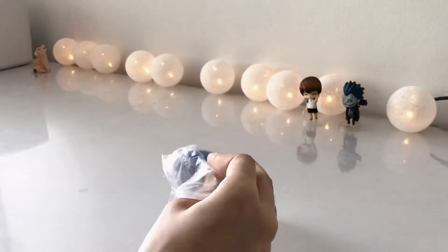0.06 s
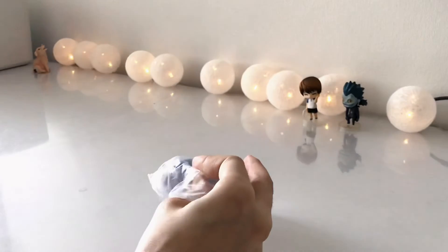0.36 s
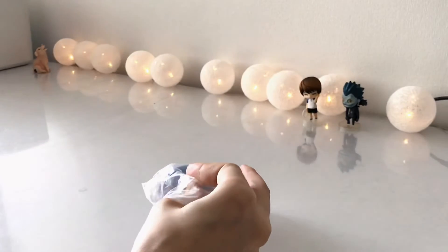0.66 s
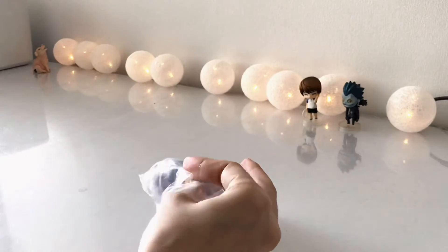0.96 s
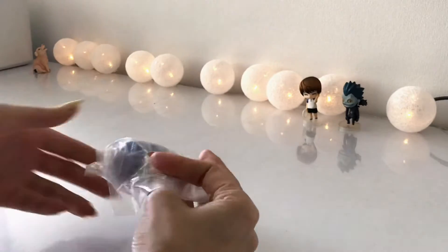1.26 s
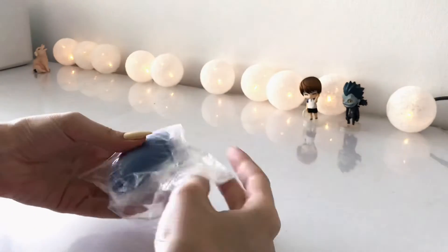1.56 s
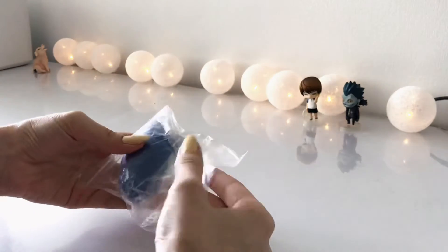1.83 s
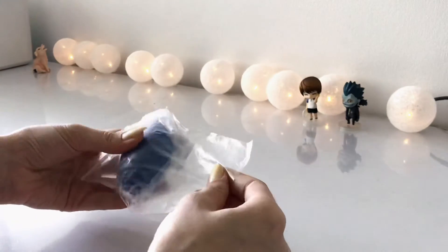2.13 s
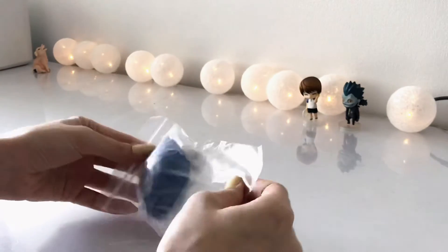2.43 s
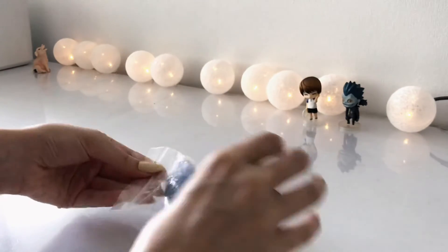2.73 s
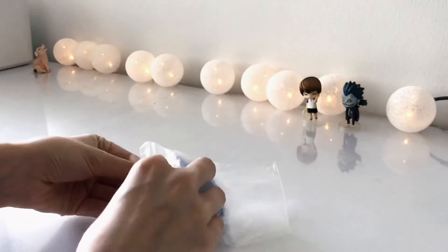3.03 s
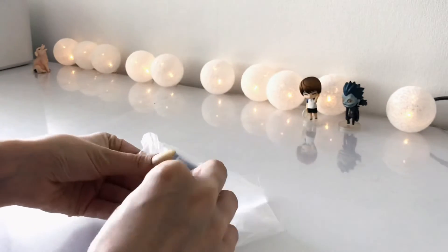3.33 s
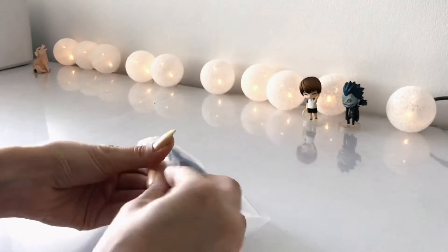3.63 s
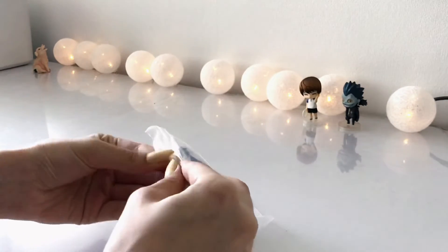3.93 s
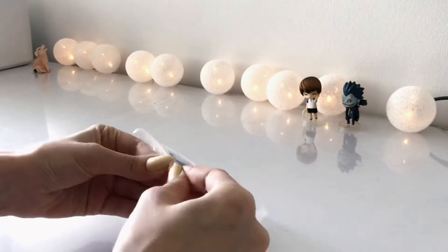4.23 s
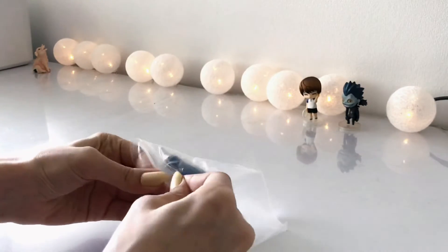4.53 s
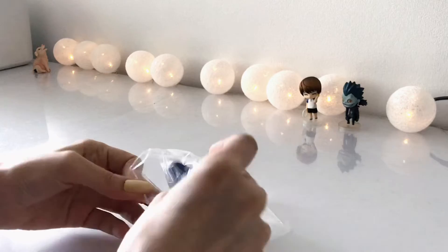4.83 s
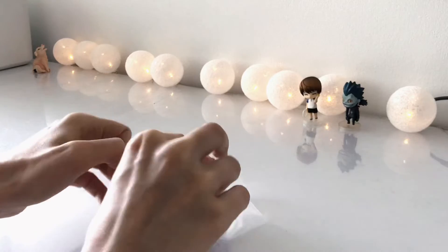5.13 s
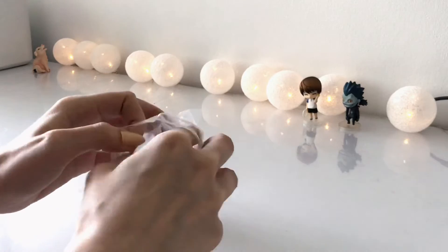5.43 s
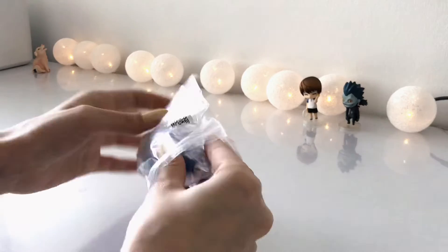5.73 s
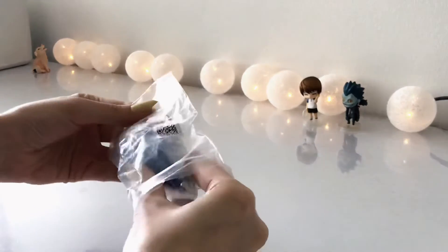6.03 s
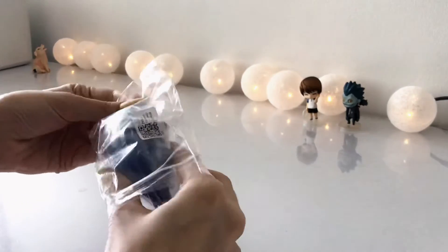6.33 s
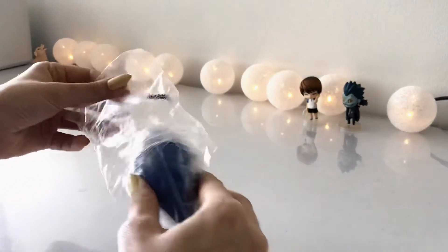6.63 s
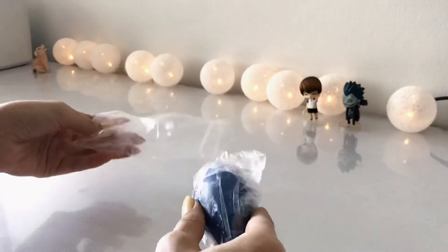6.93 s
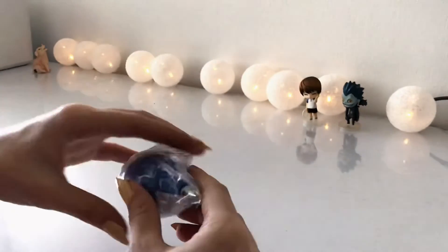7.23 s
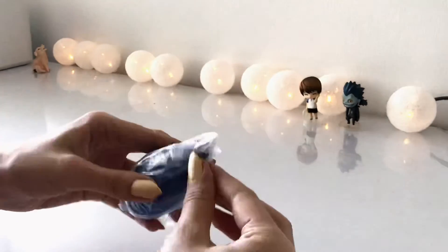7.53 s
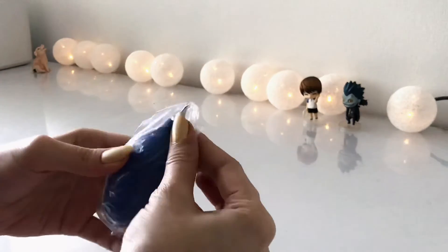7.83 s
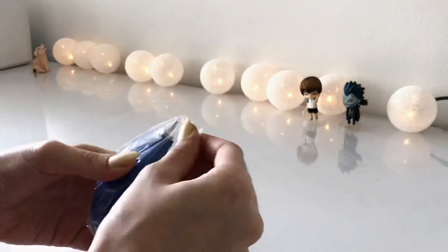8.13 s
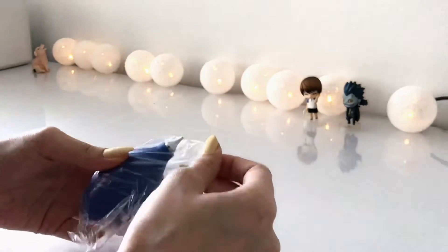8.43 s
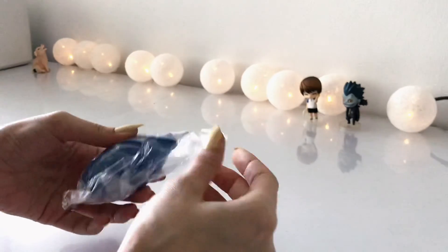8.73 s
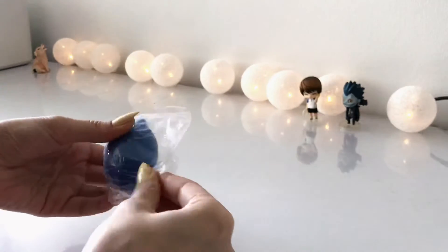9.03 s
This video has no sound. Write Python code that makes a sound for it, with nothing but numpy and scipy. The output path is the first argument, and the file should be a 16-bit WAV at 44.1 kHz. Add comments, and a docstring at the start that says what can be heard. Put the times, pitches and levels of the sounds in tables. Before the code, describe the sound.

A thin plastic bag is handled close by, just above a hard table in a small, quiet room. It begins with a soft, hissing rustle and a couple of dull bumps from the rubber bulb inside. From about 1.4 seconds the plastic crinkles in short, uneven pulls, dotted with sharp snaps, and slides with a light hiss around 3 seconds. The loudest stretch runs from about 4.6 to 6.8 seconds: dense crackling, with hard snaps at 4.6 and 4.8, a low pop and a few soft knocks. It drops away briefly around 7 seconds, then returns as a finer, higher crackle of stretched film. A strong snap with a pop comes at 8.5 seconds, and a last rustle with soft bumps follows around 9. Faint room noise and a trace of electrical hum lie underneath, with a low hum that comes and goes.

```python
"""In a small, quiet room, just above a hard table, two hands work a rubber bulb out of a thin plastic bag.
Each pull makes the plastic rustle: many tiny creases flip over, and the film hisses as it slides on itself.
Larger creases give way in single sharp snaps, some with a low pop, and the bulb bumps softly.
Behind it are room noise, a trace of mains hum and a low hum that comes and goes."""
import sys
import numpy as np
from scipy import signal
from scipy.fft import rfft, irfft
from scipy.io import wavfile
from scipy.ndimage import uniform_filter1d

SR = 44100
rng = np.random.default_rng(int(sys.argv[2]) if len(sys.argv) > 2 else 0)


def wav_record(signal):
    """Record a signal, one row per channel, as 16-bit PCM in the file named by sys.argv[1]."""
    frames = np.transpose(np.atleast_2d(signal))
    bounded = np.clip(frames, -1, 1)
    # unit amplitude maps onto the largest positive 16-bit level
    quanta = np.round(bounded * 32767).astype(np.int16)
    wavfile.write(sys.argv[1], SR, quanta)


N = 408807
TIME = np.arange(N) / SR
GRAIN_TIME = np.arange(1024) / SR   # the clock for one tiny sound


def from_db(db):
    """Turn decibels into a number to multiply by."""
    return 10 ** (np.asarray(db) / 20)


def rms_one(x):
    """Scale a sound to an average power of 1."""
    return x / np.sqrt(np.mean(x ** 2) + 1e-20)


def energy_one(x):
    """Scale a sound to a total energy of 1."""
    return x / np.sqrt(np.sum(x ** 2) + 1e-20)


def in_time(rows):
    """Join (time, value) points with straight lines, one value per sample."""
    return np.interp(TIME, *np.transpose(rows))


def at_hz(points, hz):
    """Look up (frequency, value) points, with octaves evenly spaced."""
    frequencies, values = np.transpose(points)
    return np.interp(np.log(hz + 1e-9), np.log(frequencies), values)


def add(track, s, sound):
    """Mix a sound into a track, starting at s seconds."""
    start = int(np.clip(round(s * SR), 0, N - 1))
    track[start:start + len(sound)] += sound[:N - start]


def colour(x, spectrum, size=4096):
    """Give a sound the tone in a table, with no ringing ahead of it (minimum phase)."""
    gains = from_db(at_hz(spectrum, np.fft.rfftfreq(size, 1 / SR)))
    cepstrum = irfft(np.log(gains))
    response = irfft(np.exp(rfft(2 * cepstrum[:size // 2], size)))
    return signal.oaconvolve(x, energy_one(response))[:len(x)]


def band(x, hz, kind):
    """Keep the lows, the highs or a band in between."""
    return signal.sosfilt(signal.butter(2, hz, kind, fs=SR, output="sos"), x)


def resonance(x, hz, width_hz):
    """Let a sound ring around one pitch."""
    q = hz / min(width_hz, SR / 3)
    return signal.lfilter(*signal.iirpeak(min(hz, SR / 2.5), q, fs=SR), x)


def drift(per_s, size=4096):
    """Wander towards a new random value per_s times a second."""
    return np.interp(TIME * per_s, np.arange(size), rng.standard_normal(size))


def evened(x, window_s=0.029):
    """Hold the average loudness steady while single ticks still stand out."""
    local_power = np.abs(uniform_filter1d(x ** 2, int(window_s * SR)))
    return x / np.sqrt(local_power + 1e-9 * np.mean(x ** 2))


# The tone of the room's noise: f/Hz, relative level/dB
NOISE_TONE = [(20, -28), (35, -3), (50, 3), (80, -0.5), (130, 2), (200, -3.5), (300, -3.5), (480, -13),
              (1000, -10), (2000, -18.5), (5000, -27.5), (16000, -29)]
def room_noise(level_db=-63.5):
    """The room gives a faint, steady rush, mostly bass."""
    return from_db(level_db) * rms_one(colour(rng.standard_normal(N), NOISE_TONE))


def mains_hum(hz=51.2, level_db=-74, waver_db=5.0):
    """The mains power hums on one deep note whose loudness wavers."""
    level = from_db(level_db + waver_db * drift(5.4))
    return level * np.sqrt(2) * np.sin(2 * np.pi * hz * TIME)


# Swells of the low hum, each at its peak: t/s, level/dB, half width/s
HUM_SWELLS = [(.15, -68, 0.057), (.8, -64, 0.051), (7.27, -73.5, 0.24), (8.68, -59, 0.09),
              (8.93, -66.5, .05), (9.26, -63.5, .1)]
def low_hum(hz=177, waver_hz=1.49, rest_db=-76.5):
    """A slightly unsteady note swells up from a faint level and fades back."""
    swells = sum(from_db(db) * np.exp(-((TIME - s) / width_s) ** 2) for s, db, width_s in HUM_SWELLS)
    phase = 2 * np.pi * np.cumsum(hz + waver_hz * drift(7.3)) / SR
    return (from_db(rest_db) + swells) * np.sqrt(2) * np.sin(phase)


# How long the echo takes to fade by 60 dB: f/Hz, fade time/s
ECHO_FADE = [(200, 0.61), (600, 0.58), (1500, 0.39), (4000, 0.39), (14000, 0.46)]
# The tone that the walls give back: f/Hz, relative level/dB
WALL_TONE = [(300, 1.5), (1200, -4), (3200, -0.5), (6000, -3), (14000, -10)]
def room_echo(x, level_db=-14, first_wall_s=0.00684, size=24000):
    """Sound returns from the nearest wall, then from all around; each band fades at its own pace."""
    t = np.arange(size) / SR
    noise = rng.standard_normal((2, size))
    edges_hz = np.geomspace(100, 18000, 9)
    tail = np.zeros(size)
    for k, (low, high) in enumerate(zip(edges_hz, edges_hz[1:])):
        fade_s = at_hz(ECHO_FADE, np.sqrt(low * high))
        tail += band(noise[k % 2], [low, high], "band") * from_db(-60 * t / fade_s)
    echo = energy_one(colour(tail * (t > first_wall_s), WALL_TONE))
    return from_db(level_db) * signal.oaconvolve(x, echo)[:N]


# Dull knocks: soft bumps of the bulb and the low pop of some big plastic snaps: t/s, level/dB, f/Hz
KNOCKS = [(.178, -23, 480), (.625, -23.5, 100), (1.429, -38, 260), (1.97, -33, 250), (4.625, -22, 330),
          (4.795, -25, 233), (4.7955, -11, 836), (5.312, -26, 90), (5.35, -19, 314), (5.424, -21.5, 290),
          (6.659, -29, 101), (7.067, -24.5, 485), (8.244, -28, 202), (8.488, -18.5, 804), (9.08, -27, 112),
          (9.202, -24, 294)]
def dull_knocks(cycles=2.5, relative_width=0.3, size=8192):
    """The bulb bumps or a big snap pops low; each knock dies away within a few vibrations."""
    out, t = np.zeros(N), np.arange(size) / SR
    for s, level_db, hz in KNOCKS:
        push = rng.standard_normal(size) * np.exp(-t * hz / cycles)
        knock = band(resonance(push, hz, relative_width * hz), 2 * hz, "low")
        add(out, s, from_db(level_db) * energy_one(knock))
    return out


# The light rustle of just holding the bag: t/s, level/dB
HOLDING = [(0, -60), (.12, -67.5), (.85, -67.5), (1.25, -78), (1.6, -68), (2.55, -60), (2.85, -69.5),
           (3.8, -65), (4.13, -71.5), (4.55, -66.5), (4.7, -54.5), (6.6, -57.5), (7.1, -74), (7.5, -67.5),
           (9.27, -68.5)]
# Pulls and squeezes: t/s, length/s, midway level/dB, rise over the pull/dB, slack part/dB, taut part/dB
PULLS = [(0.169, 0.19, -56, -19.5, -3, -2), (0.359, .12, -58, -9.5, -3.5, -1.5),
         (0.608, 0.075, -56.5, -18, 0, -7.5), (0.923, 0.057, -59, -5, -7, 4),
         (1.008, 0.077, -63, -4, -4, -6), (1.214, 0.018, -59.5, -5, 4.5, -6.5),
         (1.331, .08, -54, 6, -5.5, -1), (1.443, 0.068, -46.5, -9.5, -6, -2),
         (1.53, 0.15, -56.5, -3, -7.5, -6), (1.699, 0.059, -56, -6, -5.5, -3),
         (1.848, .15, -50, 8.5, -4, -2.5), (2.096, .015, -53, -1, -3, -3.5),
         (2.183, 0.078, -54.5, 7, -6, 0), (2.31, .15, -54.5, 14, -6.5, -4.5),
         (2.622, 0.12, -55.5, 4.5, -3.5, -6.5), (2.931, .15, -58, -10, -2.5, -3),
         (3.172, .008, -57, -1.5, -5, 0), (3.252, 0.12, -57.5, -4, -4.5, -2.5),
         (3.424, .12, -50.5, 8.5, -6.5, -4), (3.594, 0.045, -50, 2, -6, -6.5),
         (3.658, 0.14, -63.5, -13, -0.5, 2.5), (3.921, 0.043, -59.5, 12, -7, 0),
         (4.021, 0.042, -67, 0, 1, 1.5), (4.164, 0.078, -56.5, -6, -4, 0.5), (4.272, .13, -58, 0, -1.5, -2),
         (4.483, .015, -52, -5, -4, 1.5), (4.585, 0.12, -39, -11.5, -7, 0),
         (4.802, 0.053, -44.5, -10, -12, -10), (4.906, .15, -46, 5.5, -7.5, -5.5),
         (5.151, 0.054, -52, -3, -1, -1.5), (5.251, 0.12, -47, 0, -3.5, -2),
         (5.433, 0.2, -46, -3, -5.5, -0.5), (5.677, 0.11, -51.5, -13, -4, -3),
         (5.869, .21, -52, -3, -4.5, -3), (6.207, 0.081, -47.5, -0.5, -5, -1),
         (6.384, 0.28, -47, 6, -5.5, -2.5), (6.722, 0.13, -62.5, -3, -1.5, -3),
         (7.031, .06, -60, 14.5, -3, -4), (7.216, 0.059, -67, 0, -13, 8), (7.282, 0.028, -50.5, 0, -12, 3),
         (7.33, 0.19, -60, 0.5, -8.5, 7), (7.558, .43, -65, -0.5, -22, 9), (8.038, .22, -53.5, 13, -6, 5),
         (8.321, 0.011, -57, 0, -1, 2.5), (8.424, 0.12, -54.5, -6, -8, 3),
         (8.647, 0.11, -55.5, -1, -11.5, 1.5), (8.838, .13, -66.5, 3, -9, 7.5),
         (8.987, .25, -50, 2.5, -6, 2)]
def handling(grab_s=0.011, settle_s=0.015, held_slack_db=-4, held_taut_db=-2.5):
    """Fingers grab, pull and let go. Gives the rustle's dB, and its slack and taut parts relative to it."""
    power = np.outer(from_db([0, held_slack_db, held_taut_db]), from_db(in_time(HOLDING))) ** 2
    for s, length_s, level_db, rise_db, slack_db, taut_db in PULLS:
        t = TIME[TIME < length_s + 10 * settle_s]
        effort = from_db(level_db + rise_db * (np.minimum(t / length_s, 1) - .5))
        grab = np.minimum(t / grab_s, 1)
        settle = np.exp(-np.maximum(t - length_s, 0) / settle_s)
        for track, part_db in zip(power, (0, slack_db, taut_db)):
            add(track, s, (from_db(part_db) * effort * grab * settle) ** 2)
    level, slack, taut = 10 * np.log10(power)
    return level, slack - level, taut - level


# The tone of the loose plastic sheet: f/Hz, relative level/dB
SHEET_TONE = [(90, -25.5), (220, -6), (330, -4.5), (500, -8), (750, -3.5), (1250, 2.5), (1650, -0.5),
              (2100, -12), (3500, -54.5)]
def sheet_flap(decay_s=0.0024):
    """The sheet around a crease moves with it and makes a short, lower sound."""
    shake = rng.standard_normal(len(GRAIN_TIME)) * np.exp(-GRAIN_TIME / decay_s)
    return energy_one(colour(shake, SHEET_TONE, size=1024))


def crack(hz, q, flutter_s=0.0025, flutter_db=-5.0, run_s=.0008, follow_db=-10.0, table_db=-8.5):
    """A crease gives way in a few quick flips, then flutters. A higher q rings with a clearer pitch."""
    flips = signal.unit_impulse(len(GRAIN_TIME))
    for strength, late in zip(rng.standard_normal(3), rng.random(3)):
        flips[int(late * run_s * SR) + 1] += from_db(follow_db) * strength
    # Pitches travel through the film at different speeds, which smears the click.
    flips = flips - 2 * resonance(flips, hz, hz * rng.uniform(0.47, 1))
    flutter = energy_one(rng.standard_normal(len(GRAIN_TIME)) * np.exp(-GRAIN_TIME / flutter_s))
    ring = resonance(energy_one(flips) + from_db(flutter_db) * flutter, hz, hz / q)
    direct = band(ring, 1830, "high")
    delay_s = rng.uniform(0.000597, .0026)
    table_echo = np.interp(GRAIN_TIME - delay_s, GRAIN_TIME, direct, left=0)
    return energy_one(direct + from_db(table_db) * table_echo)


def tiny_creases(per_s, size_db=5.5, long_q=3.1, short_q=0.69, flap_scatter_db=4.5, count=90):
    """Tiny creases flip at random, most weakly, a few hard. Gives their cracks and their flaps."""
    sizes = from_db(size_db * np.minimum(rng.exponential(1, N), 3.0)) * rng.choice([-1, 1], N)
    flap_sizes = sizes * from_db(flap_scatter_db * rng.standard_normal(N).clip(-2, 2))
    which_crease = rng.integers(0, count, N)
    # Long creases pop low with a clear pitch; short ones give a bright, dry tick.
    pitches, sharpness = np.geomspace(1600, 14000, count), np.geomspace(long_q, short_q, count)
    creases = [(crack(hz, q), sheet_flap()) for hz, q in zip(pitches, sharpness)]
    cracks, flaps = np.zeros(N), np.zeros(N)
    for i in np.flatnonzero(rng.random(N) < per_s / SR):
        tick, flap = creases[which_crease[i]]
        add(cracks, TIME[i], sizes[i] * tick)
        add(flaps, TIME[i], flap_sizes[i] * flap)
    return rms_one(cracks), rms_one(flaps)


# The hiss of film sliding on film, relative to the crackle: t/s, level/dB
SLIDING = [(0, 2), (.5, 5), (.8, -8), (2.5, -7), (2.8, -1), (3.35, 1.5), (3.9, -10), (4.5, -18.5),
           (5.4, -7), (6.2, -10), (7.2, -2), (7.7, -11), (8.2, -2.5)]
# The tone of ordinary creases: f/Hz, relative level/dB
CREASE_TONE = [(800, -13.5), (1300, -9), (1700, -0.5), (2300, -1.5), (3400, -0.5), (5300, 1.5),
               (6500, -5.5), (9000, -30)]
# The tone of fine creases in taut film: f/Hz, relative level/dB
FINE_TONE = [(2500, -40), (4500, -1.5), (6500, -2), (9000, 1.5), (12000, -0.5), (15800, -3.5)]
def rustle(per_s=520, taut_thinning=0.27, clump_db=4.5, sheet_db=0.24, fine_db=1.38, fine_hiss_db=-3.0):
    """Creases flip in clumps over the sliding hiss: more under a firm grip, fewer in taut film."""
    level_db, slack_db, taut_db = handling()
    busy_db = 0.3 * (level_db - level_db.mean()) - taut_thinning * np.maximum(taut_db, 0)
    cracks, flaps = tiny_creases(per_s * from_db(busy_db + clump_db * drift(70)))
    hiss = from_db(in_time(SLIDING)) * rng.standard_normal(N)
    creases = evened(colour(cracks + hiss, CREASE_TONE))
    sheet = from_db(slack_db + sheet_db) * evened(flaps + colour(hiss, SHEET_TONE))
    fine = from_db(taut_db + fine_db) * evened(colour(cracks + from_db(fine_hiss_db) * hiss, FINE_TONE))
    return from_db(level_db) * (creases + sheet + fine)


def stray_snaps(per_s=7, snap_db=-26.5, follows_rustle=0.49, scatter_db=4.5, flap_db=-11.0, middle_hz=4000):
    """Medium creases snap at random: harder in a firm grip, higher in taut film, seldom as it slides."""
    level_db, _, taut_db = handling()
    sliding_db = in_time(SLIDING)
    chance = per_s * from_db(sliding_db.mean() - sliding_db) / SR
    size_db = snap_db + follows_rustle * (level_db - level_db.mean())
    out = np.zeros(N)
    for i in np.flatnonzero(rng.random(N) < chance):
        octaves = 0.18 * taut_db[i] + rng.uniform(-1, 1)
        hz = np.clip(middle_hz * 2 ** octaves, 1200, 14000)
        snap = crack(hz, q=2.3, flutter_db=-8.0) + from_db(flap_db - taut_db[i]) * sheet_flap()
        add(out, TIME[i], from_db(size_db[i] + scatter_db * rng.uniform(-0.7, 1)) * snap)
    return out


# Big creases giving way, before the boosts below: t/s, level/dB, f/Hz, sharpness q, relative flap level/dB
BIG_SNAPS = [(0.6687, -27, 2980, 2.5, -6), (0.7137, -21.5, 1710, 14, -0.5), (.9094, -26.5, 3200, 2.5, -1.5),
             (1.0079, -17, 6900, .23, -9.5), (1.0926, -29.5, 2100, 1, -4), (1.4163, -14.5, 1290, 0.39, -2),
             (1.4416, -17.5, 7200, 0.46, -6), (1.553, -14, 5300, .6, -17), (1.655, -17, 7100, .4, -24),
             (1.8927, -14.5, 3400, .46, -28), (1.9686, -13, 2700, 1, -8), (1.9871, -13.5, 11700, 4.8, -19),
             (2.0233, -26.5, 1300, 0.31, 9), (2.1711, -27, 7200, .44, -5), (2.2112, -11, 5560, 2, -9),
             (2.4052, -9.5, 6400, 2.1, -16.5), (2.4807, -23.5, 1410, 4, -20.5),
             (2.543, -22, 3200, 0.71, -21), (2.9419, -19, 1800, 0.68, -16), (2.9486, -18.5, 2900, 0.55, -7),
             (3.1981, -22.5, 2920, 4.3, -10), (3.4574, -23.5, 2400, 1.6, -6), (3.5595, -8.5, 7500, .4, -31),
             (3.5669, -12.5, 4560, 1.3, -12), (3.643, -16, 1980, .5, -7), (3.88, -19.5, 3770, 0.86, -11),
             (3.9738, -21, 4700, 2.5, -12), (4.0961, -27.5, 1500, 3.2, -2.5), (4.1615, -19, 7200, .5, -9),
             (4.2947, -19.5, 1270, .4, -4.5), (4.31, -25, 1500, 4, 1), (4.3479, -14, 3170, 0.38, -15),
             (4.4375, -17, 3940, 3, -14.5), (4.5401, -16, 7600, .44, -13.5), (4.5941, -2, 5300, 0.45, -14),
             (4.617, -9, 3700, .43, -13), (4.6819, -6, 4900, 0.81, -11.5), (4.691, -10.5, 6000, .7, -16),
             (4.7679, -14, 2930, 1.1, -21), (4.7949, -2.5, 3100, 3.5, -27), (4.8921, -14.5, 6350, 1.4, -17),
             (4.9335, -13.5, 1321, 0.61, -10.5), (4.9586, -12, 9300, 5.3, -20),
             (4.998, -14, 2110, 0.78, -10), (5.028, -8, 1330, 1.6, -7), (5.0366, -10, 1300, 0.51, -19),
             (5.106, -12.5, 6660, 2.7, -11), (5.156, -19.5, 1370, 0.29, 1),
             (5.2638, -12.5, 4400, 1.6, -16.5), (5.3079, -8.5, 3950, 0.45, -11),
             (5.3704, -12.5, 7600, 1.9, -8), (5.428, -14, 5600, 0.68, -3.5), (5.454, -16.5, 4400, 3, -14),
             (5.6892, -15, 3770, 1.6, -26), (5.8383, -17.5, 2500, 0.46, -13), (5.9643, -16, 4100, 1.5, -15),
             (5.9905, -14, 7600, 1.5, -13), (6.037, -15.5, 2520, 0.44, -5.5),
             (6.0767, -16.5, 2900, .8, -19), (6.2241, -13, 3100, 1.5, -11), (6.2609, -9.5, 7100, .4, -16),
             (6.427, -11, 5300, 1.8, -23), (6.4718, -13.5, 5000, .7, -13), (6.58, -10, 5000, 0.54, -28),
             (6.603, -12, 1900, 0.31, -6.5), (6.6603, -10, 5000, .5, -12), (6.6836, -13, 3200, .7, -12.5),
             (6.7807, -17.5, 7700, 1.7, -9), (6.8596, -13, 8000, 1.7, -14), (7.0676, -25, 1310, 0.19, 4),
             (7.362, -18, 9000, 1.2, -30), (7.4455, -19.5, 4370, 0.53, -16),
             (7.8193, -19.5, 14000, .5, -24), (7.8421, -16, 13900, 1, -25), (8.0232, -20, 12200, 0.42, -26),
             (8.261, -19, 9150, .5, -9), (8.344, -32.5, 1600, 2, 7.5), (8.4876, -7, 1820, 0.42, -8),
             (8.5357, -15.5, 11600, .5, -26), (8.6348, -21, 13900, 1, -20), (8.9293, -25, 8600, .5, -23),
             (9.1156, -19, 8100, .5, -17)]
def big_snaps(crack_boost_db=0.5, flap_boost_db=1.0):
    """Each big crease gives a sharp crack and a flap of the sheet."""
    out = np.zeros(N)
    for s, level_db, hz, q, flap_db in BIG_SNAPS:
        snap = from_db(crack_boost_db) * crack(hz, q, flutter_s=0.0037)
        flap = from_db(flap_db + flap_boost_db) * sheet_flap()
        add(out, s, from_db(level_db) * (snap + flap))
    return out


def scene():
    """The bag and bulb are close by, with the room behind them."""
    hands = big_snaps() + stray_snaps() + rustle() + dull_knocks()
    return (hands + room_echo(hands) + room_noise() + mains_hum() + low_hum())[None]


# Pitches that the microphone's opening cuts or lifts: f/Hz, width/Hz, level change/dB
MIC_RESONANCES = [(4760, 1200, -2), (7720, 530, -4), (10490, 850, -6.5), (14400, 3000, 2.5)]
def record(dry, cutoff_hz=15950):
    """The microphone's opening carves narrow dips and lifts the high treble; the very top is cut off."""
    out = dry
    for hz, width_hz, gain_db in MIC_RESONANCES:
        out = out + (from_db(gain_db) - 1) * resonance(out, hz, width_hz)
    return signal.sosfilt(signal.ellip(10, .2, 80, cutoff_hz, fs=SR, output="sos"), out)


dry = scene()
out = record(dry)
wav_record(out)
```